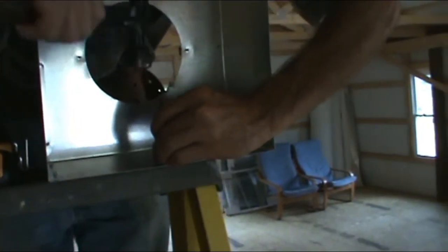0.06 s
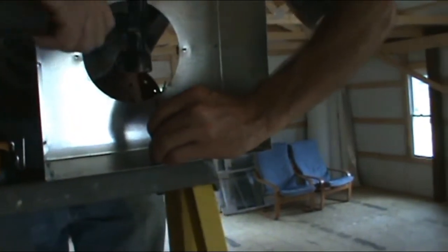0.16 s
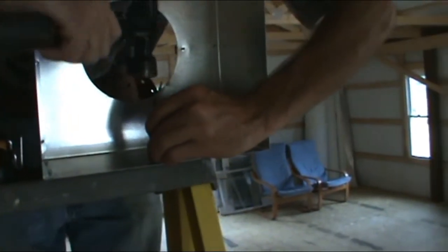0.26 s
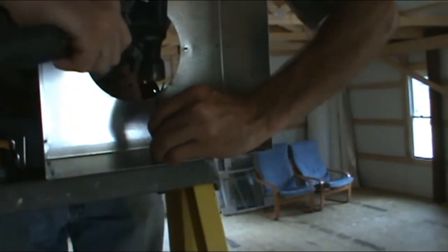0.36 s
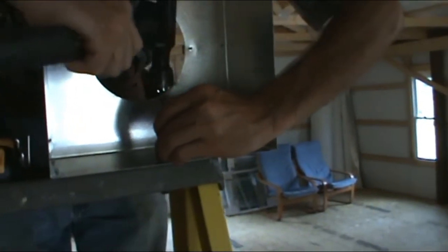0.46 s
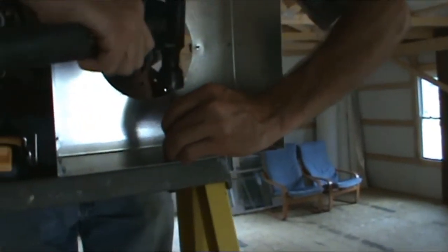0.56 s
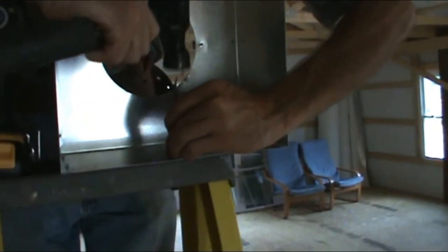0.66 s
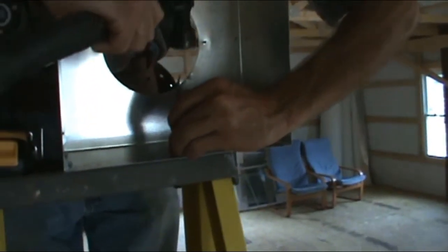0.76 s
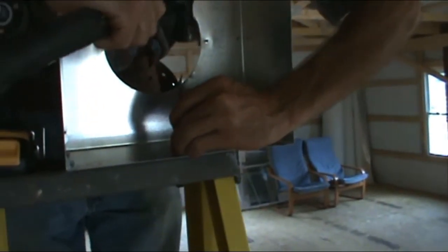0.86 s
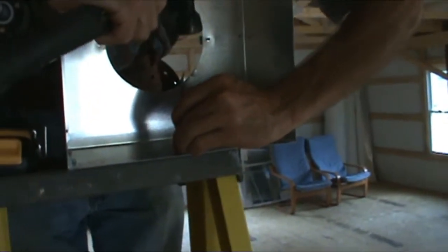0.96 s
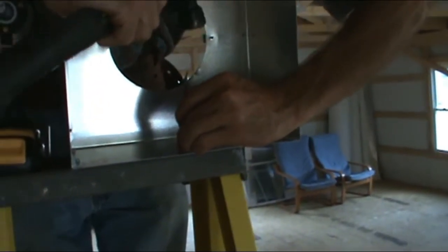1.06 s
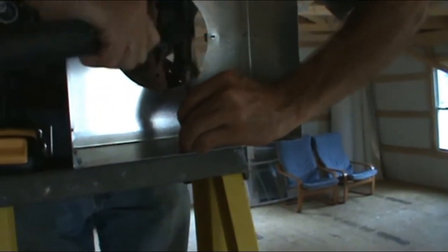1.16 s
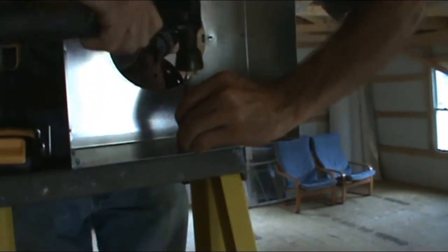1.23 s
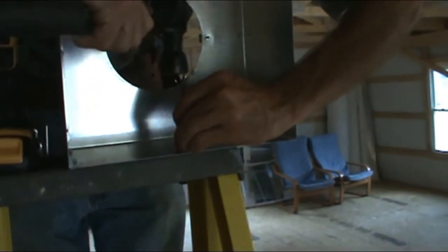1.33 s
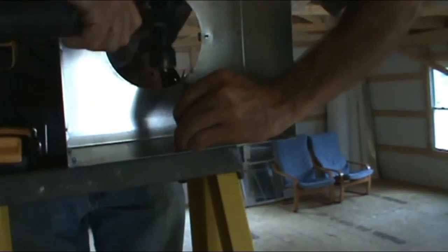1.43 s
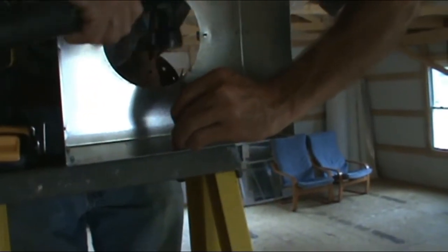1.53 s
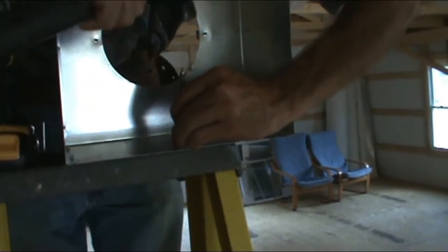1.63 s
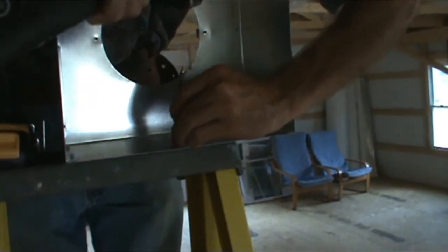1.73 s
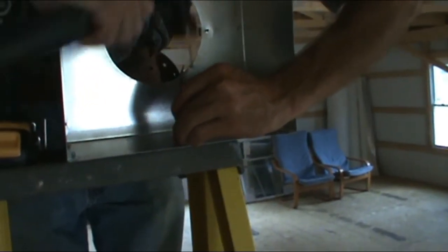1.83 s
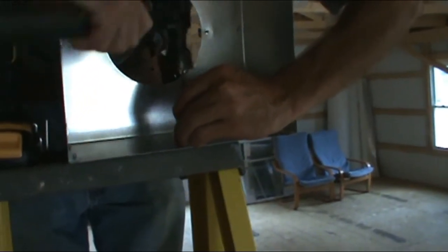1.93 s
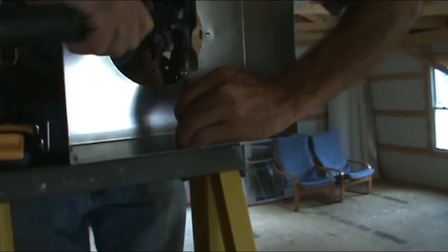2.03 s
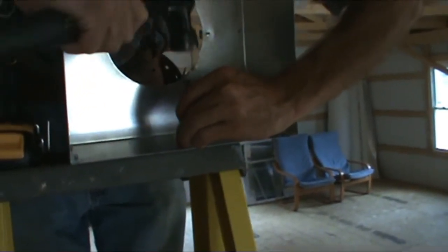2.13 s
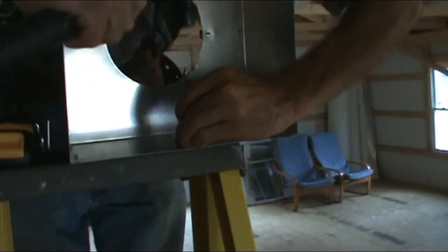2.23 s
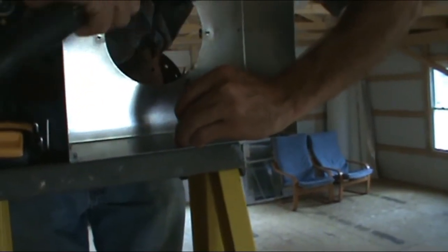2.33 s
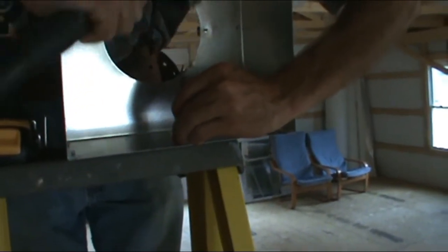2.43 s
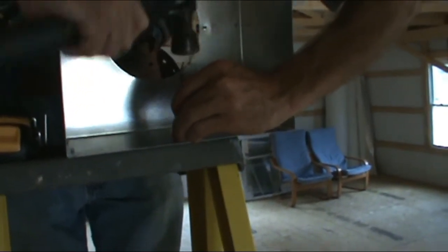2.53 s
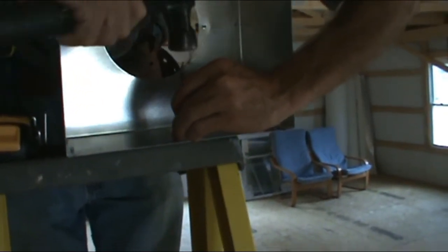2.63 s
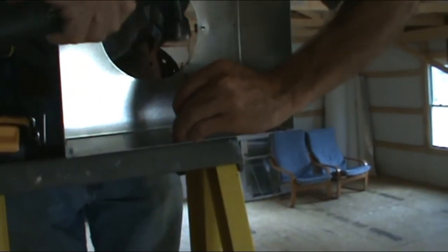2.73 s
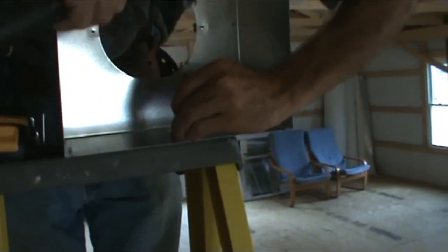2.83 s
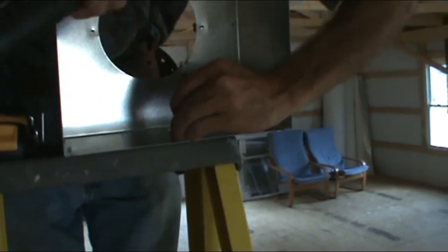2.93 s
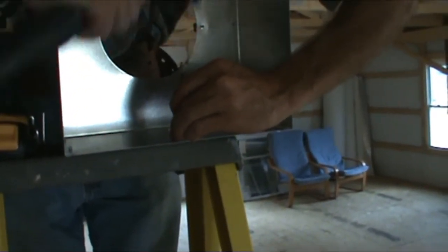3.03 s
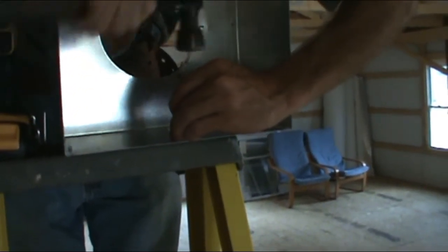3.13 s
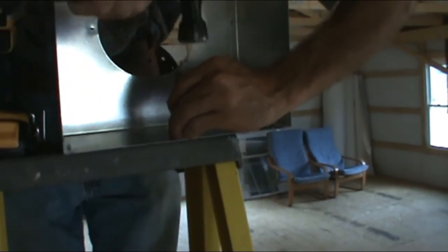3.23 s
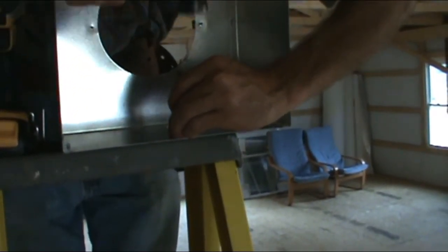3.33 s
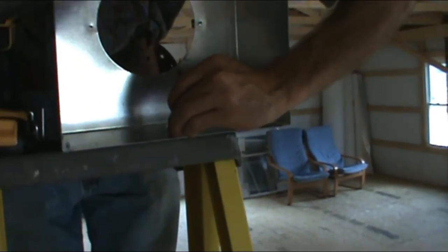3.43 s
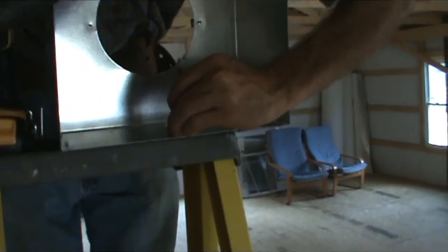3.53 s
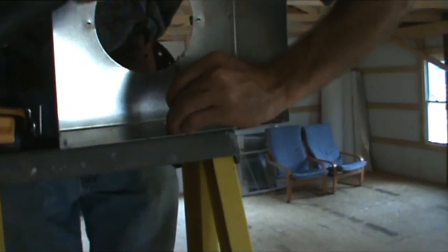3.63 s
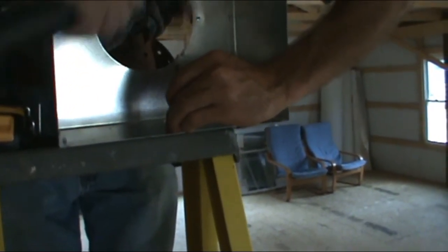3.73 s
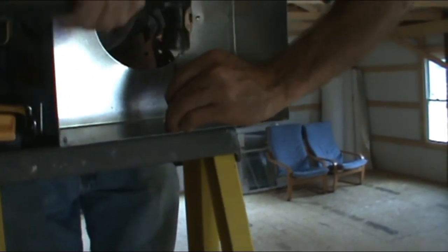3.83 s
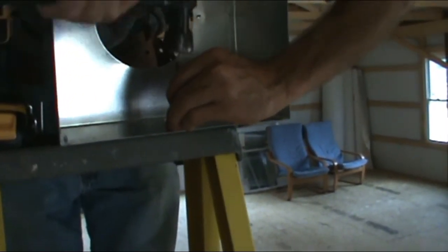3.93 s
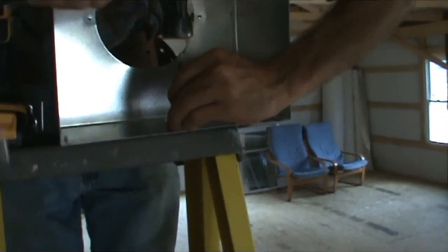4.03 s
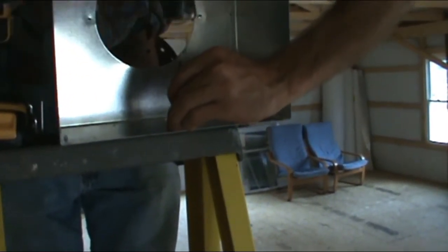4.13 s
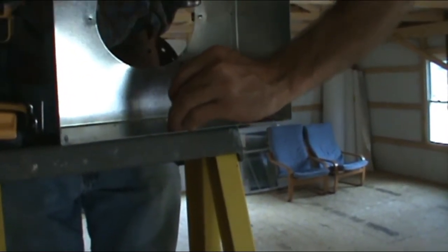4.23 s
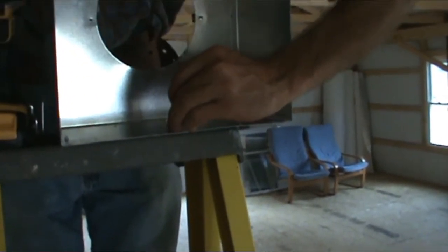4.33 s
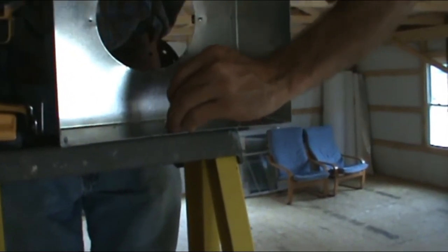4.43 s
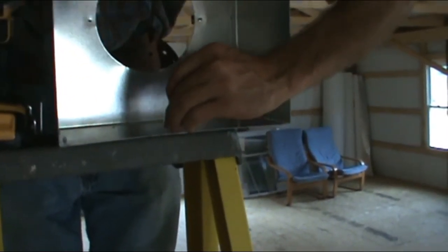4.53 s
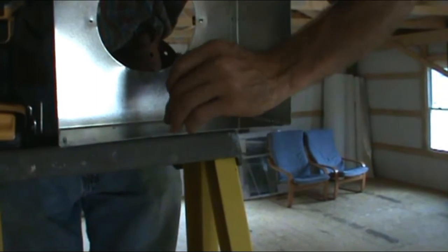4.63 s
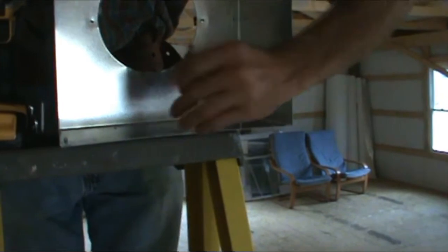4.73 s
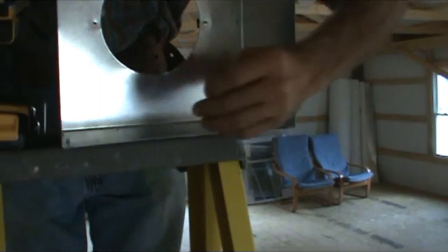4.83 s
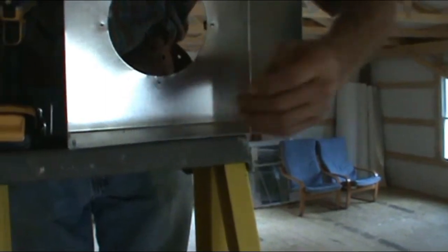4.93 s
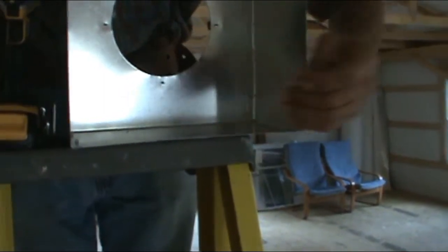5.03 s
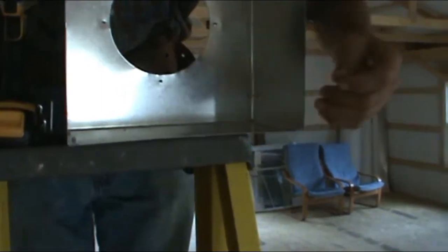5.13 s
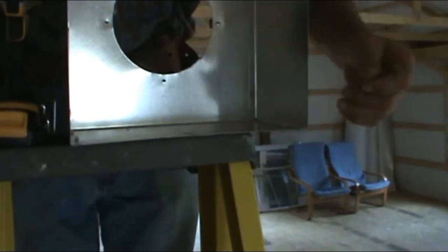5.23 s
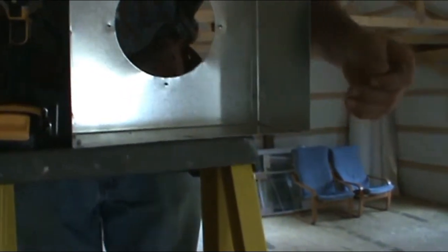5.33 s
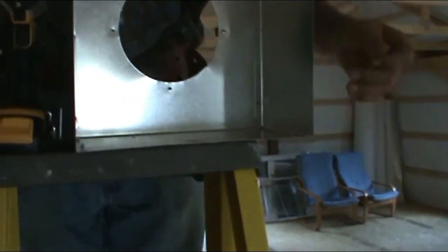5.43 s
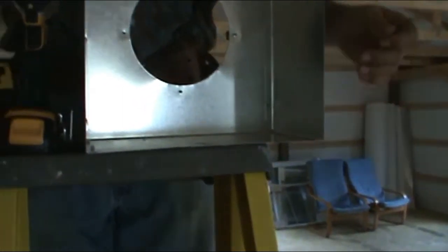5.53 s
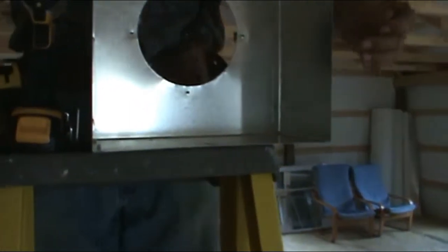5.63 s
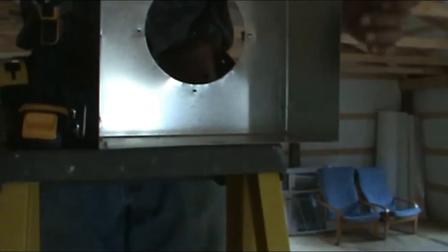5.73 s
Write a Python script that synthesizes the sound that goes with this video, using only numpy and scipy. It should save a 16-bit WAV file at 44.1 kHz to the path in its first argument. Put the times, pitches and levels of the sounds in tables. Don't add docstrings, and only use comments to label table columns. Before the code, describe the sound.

After a near-quiet start with hiss and a faint slide, heavy hammering begins on a thin metal duct on a bench. The first blow is looser and shorter; the next five are louder, dense and clangorous, flattened by the camera's limiter. A high steel clink, a knock and a scuffing shove follow while the ring dies away in a lively wooden shed.

```python
import sys
import numpy as np
from scipy import signal
from scipy.fft import rfft, irfft
from scipy.io import wavfile
from scipy.ndimage import uniform_filter1d, minimum_filter1d

SR = 44100
rng = np.random.default_rng(int(sys.argv[2]) if len(sys.argv) > 2 else 0)


def ratio(d):
    e = np.asarray(d, float) / 20
    return 10 ** e


def int16_out(signal):
    q = np.round(np.clip(np.atleast_2d(signal).T, -1, 1) * 32767)
    wavfile.write(sys.argv[1], SR, q.astype(np.int16))


N = 254412


def read(points, hz):
    f, value = np.transpose(points)
    return np.interp(np.log(hz + 1), np.log(f + 1), value)


def evened(x):
    return x / np.sqrt(np.mean(x ** 2) + 1e-20)


def add(mix, start_s, sound):
    part = mix[..., round(start_s * SR):][..., :sound.shape[-1]]
    part += sound[..., :part.shape[-1]]


def coloured(points, length=N, count=1):
    z = rfft(rng.standard_normal((count, length)))
    z = z * ratio(read(points, np.fft.rfftfreq(length, 1 / SR)))
    return evened(irfft(z, length))


def modes(table, length, wobble, spread_db):
    hz, db, t60_s = np.transpose(table)[:, :, None]
    t = np.arange(length) / SR
    luck = rng.standard_normal((len(table), 2))
    knot_gap = 1200
    knots = rng.standard_normal((len(table), length // knot_gap + 2))
    waver = np.array([np.interp(np.arange(length) / knot_gap, np.arange(len(k)), k) for k in knots])
    turns = np.cumsum(hz * (1 + wobble * waver), axis=1) / SR
    level_db = db + spread_db * luck[:, :1] - 60 * t / np.maximum(t60_s, .005)
    return (ratio(level_db) * np.sin(2 * np.pi * turns + 1.07 * luck[:, 1:])).sum(0)


def rustle():
    # start_s, peak_db, rise_s, fade_db_per_s
    stroke_groups = [
        [(0.0, -42, 0.0023, 150), (0.1, -47.5, 0.088, 123), (0.3, -53, 0.015, 600)],
        [(4.673, -20.5, 0.0048, 122), (4.846, -21.5, .002, 700), (4.88, -34, 0.03, 91)],
        [(5.673, -46, .0008, 250), (5.68, -40.5, 0.056, 324)],
    ]
    # pitch_hz, level_db (per Hz)
    stroke_colours = [
        [(59, -24), (100, 6), (143, -25), (321, -3), (367, -17), (468, -6), (609, -8), (9000, -26.5), (11700, -36), (19800, -120)],
        [(45, -30.5), (110, -6), (300, -1.5), (800, 3), (1500, -1), (2400, -6.5), (3200, -22.5), (5500, -20.5), (7000, -28), (14000, -69)],
        [(100, -15), (500, -3), (750, 6), (1400, 1.5), (2000, -10), (3000, -17), (3300, -3.5), (3700, -30), (9000, -49)],
    ]
    rise_shape = 0.4
    t, out = np.arange(N) / SR, np.zeros((2, N))
    for rows, colour in zip(stroke_groups, stroke_colours):
        start_s, peak_db, rise_s, fade_db_per_s = np.transpose(rows)[:, :, None]
        rise = np.clip((t - start_s) / rise_s, 0, 1) ** rise_shape
        fade_db = fade_db_per_s * np.maximum(t - start_s - rise_s, 0)
        strokes = rise * ratio(peak_db - fade_db)
        out += np.linalg.norm(strokes, axis=0) * coloured(colour, count=2)
    clumps = evened(uniform_filter1d(rng.standard_normal(N), 300))
    return out * ratio(1.8 * clumps - 1.5)


def ports(pair, same):
    # pitch_hz, lead_rad
    port_lead = [(60, .1), (150, .3), (340, .8), (780, .8), (1030, 1.2), (1720, .6), (3010, .3), (6500, .4),
                 (8200, .15), (15800, 0)]
    # pitch_hz, level_db
    left_over_right = [(60, -8), (110, 1), (200, -1), (380, 0), (700, -3), (1290, 0), (2380, 0.0),
                       (4400, -1), (8120, 1.5), (15000, 3.5)]
    hz, (a, b) = np.fft.rfftfreq(N, 1 / SR), rfft(pair)
    same = np.clip(same(hz), 0, 1)
    right = same * a * np.exp(-1j * read(port_lead, hz)) + np.sqrt(1 - same ** 2) * b
    half = ratio(read(left_over_right, hz) / 2)
    return irfft([a * half, right / half], N)


def camera():
    # pitch_hz, level_db (per Hz)
    hiss_colour = [(15, -71), (25, -22), (123, 2.5), (166, -7), (195, 1), (277, -22.5), (373, -19.5),
                   (405, -10.5), (451, -16.5), (1070, -21), (1940, -18.5), (5430, -25.5), (7920, -19.5),
                   (8830, -25), (16000, -31)]
    # pitch_hz, level_db, t60_s
    motor_modes = [(2050, -2, .025), (2350, 0, .03), (2900, -3, .04), (3600, -7, .015), (6200, 1, .014)]
    # pitch_hz, level_db, t60_s
    body_modes = [(2130, 10.5, 0.0083), (2690, -14, 0.011), (3370, 4, 0.005), (6100, 17, 0.0072),
                  (7800, -8, .01), (8900, 6, 0.0057)]
    # start_s, peak_db
    body_clicks = [
        (0.3188, -41.5),
        (1.2354, -36.5),
        (2.537, -46),
        (4.848, -32.5),
        (5.059, -61),
    ]
    tick_s, tick_gap_s = 5.2067, 1001 / 30000
    tick_db, weak_tick_db = -52, -55
    pause_start_s, pause_end_s = .33, .8
    hiss_db, hiss_sag_db_per_s = -50, 0.5
    out = np.zeros(N)
    for k, start_s in enumerate(tick_s + tick_gap_s * np.arange(-155, 17)):
        if not pause_start_s < start_s < pause_end_s:
            level_db = tick_db if k % 2 else weak_tick_db
            add(out, start_s, ratio(level_db) * modes(motor_modes, length=1400, wobble=.011, spread_db=1.5))
    for start_s, peak_db in body_clicks:
        add(out, start_s, ratio(peak_db - 6) * modes(body_modes, length=1000, wobble=.006, spread_db=1.5))
    hiss = ratio(hiss_db - hiss_sag_db_per_s * np.arange(N) / SR) * coloured(hiss_colour, count=2)
    return out * ratio([[.5], [-.5]]) + ports(hiss, lambda hz: 0.43 + 0 * hz)


def combed(x):
    height_db, spacing_hz = 2.2, 22
    z = rfft(x)
    bins = max(round(spacing_hz * x.shape[-1] / SR), 1)
    bumps = uniform_filter1d(rng.standard_normal(z.shape[-1]), bins)
    bumps = evened(uniform_filter1d(bumps, bins))
    return irfft(z * ratio(height_db * bumps), x.shape[-1])


def blow(force_db, hold_s, tilt_db, bass_db, ring, colour, strong, strong_db, wobble):
    # pitch_hz, t60_s
    sheet_t60 = [(60, 1.44), (200, 1.165), (500, 1.324), (1000, 0.58), (2000, 0.55), (4000, 0.51),
                 (8000, 0.44), (15000, 0.28)]
    ring_knee_s = 0.023
    ring_spread = .05
    knee = 3
    length = 56000
    hz, t, z = signal.stft(combed(coloured(colour, length=length, count=2)), SR, nperseg=384, noverlap=288)
    ring_factor = ring * hold_s / (hold_s + ring_knee_s)
    ring_factor = ring_factor * np.exp(ring_spread * rng.standard_normal((len(hz), 1)))
    hz = hz[:, None] + 30
    tint_db = tilt_db * np.log2(hz / 2000) + bass_db / (1 + (hz / 800) ** 3)
    swell = 1 - 0.4 * np.exp(-t / (0.7 * hold_s)) / (1 + (hz / 900) ** 2)
    age_s = (t ** knee + hold_s ** knee) ** (1 / knee) - hold_s
    decay_db = 60 * age_s / np.maximum(read(sheet_t60, hz) * ring_factor, .02)
    z *= swell * ratio(tint_db - decay_db)
    crash = signal.istft(z, SR, nperseg=384, noverlap=288)[1][:, :length]
    crash = crash / np.sqrt(np.mean(crash[:, :600] ** 2))
    t = np.arange(length) / SR
    hum = ratio(strong_db) * modes(strong, length, wobble=wobble, spread_db=2.64)
    hum = hum * (1 - np.exp(-t / (0.24 * hold_s + 0.0035)))
    contact = 1 - np.exp(-(t / 0.00032) ** 2)
    spreading = 1 - 0.44 * np.exp(-t / (0.1 * hold_s + 0.00054))
    return ratio(force_db - 9.5) * (crash + hum) * contact * spreading


def hammering():
    # start_s, force_db, hold_s (crash feeds itself)
    first_blow = [
        (.5895, -1, 0.045),
    ]
    later_blows = [
        (1.2512, 4.1, 0.11),
        (1.963, 4.2, 0.13),
        (2.588, 5.5, 0.12),
        (3.169, 4.25, 0.15),
        (3.853, 4.4, 0.14),
    ]
    # start_s, force_db, hold_s, tilt_db (per octave), bass_db
    knocks = [
        (1.761, -5, 0.01, 6.5, 16.5),
        (3.074, -14.5, 0.041, 2.5, 14.5),
        (4.655, -11.5, 0.002, 1, -9),
        (4.674, -14.5, 0.0081, -5.5, -33),
    ]
    steel_hits = [
        (4.280, 4.5, 0.0039, -0.5, 1.1667),
        (4.848, -31, 0.002, 0.5, 8),
        (4.935, -38, 0.0045, -.7, 5.5),
    ]
    # pitch_hz, level_db, t60_s
    loose_modes = [(190, -7, 1.5), (140, -14, 1.2), (430, -7, 1.2), (465, -6, 1.15), (510, -5, 1.0),
                   (720, -9, 1.0), (883, -2, .6), (1560, -11, .7), (1730, -7, .6), (1920, -12, .5)]
    pinned_modes = [(146.44, -8, 1.48), (281.3, -19, 0.6), (393, -2, 0.84), (430.4, -4.5, 1.38),
                    (483.7, -2.5, 0.74), (556, -6.5, 1.12), (693, -9, 0.97), (735.6, -1, 0.88),
                    (924, -11.5, 1.22), (1223, -11.5, 1.02), (1875, -2.5, 0.73)]
    bench_modes = [(291.4, -2, 0.69), (392.7, -9, 1.73), (1650, -10.5, 1.2), (2300, -37, 0.355)]
    steel_modes = [(3570, -5, .24), (3955, -11, .2), (4258, -5, .22), (4883, -12, .2), (6240, -7, .22),
                   (6600, -11, .2)]
    # pitch_hz, level_db (per Hz)
    sheet_colour = [(18, -65), (30, -9.5), (404, -2.5), (600, -6), (721, 1), (988, -3.5), (1720, -4.5),
                    (2230, -8), (3220, -10.5), (7090, -17), (11100, -17.5), (16000, -29)]
    knock_colour = [(35, -53), (60, -5.5), (330, -1.5), (1090, 4), (1220, 4), (1580, 2), (3420, -10.5),
                    (4030, -13.5), (9350, -28), (16000, -44)]
    clank_colour = [(400, -22), (1000, -6.5), (2000, -7.5), (3200, -6), (3600, -0.5), (4300, 5), (5000, -2),
                    (6400, -2.5), (7200, -8), (11500, -16), (16000, -25)]

    out = np.zeros((2, N))
    for start_s, force_db, hold_s in first_blow:
        add(out, start_s, blow(force_db, hold_s, tilt_db=-.9, bass_db=-2, ring=.55, colour=sheet_colour,
                               strong=loose_modes, strong_db=-10, wobble=.018))
    for start_s, force_db, hold_s in later_blows:
        add(out, start_s, blow(force_db, hold_s, tilt_db=0.51, bass_db=-0.45, ring=.87, colour=sheet_colour,
                               strong=pinned_modes, strong_db=-8.5, wobble=.014))
    for start_s, *hit in knocks:
        add(out, start_s, blow(*hit, ring=.7, colour=knock_colour,
                               strong=bench_modes, strong_db=-14, wobble=.008))
    for start_s, *hit in steel_hits:
        add(out, start_s, blow(*hit, ring=.45, colour=clank_colour,
                               strong=steel_modes, strong_db=-10, wobble=.0015))
    return out


def shed(x, wet_db):
    # pitch_hz, t60_s
    shed_t60 = [(60, 0.27), (200, 0.68), (500, 1), (1000, 0.77), (2000, 0.65), (4000, 0.44), (8000, 0.43),
                (15000, 0.42)]
    length = 3 * SR // 2
    taps = np.zeros((2, length))
    at = np.arange(200, length - 10, 10)
    at = at + rng.integers(0, 10, (2, len(at)))
    np.put_along_axis(taps, at, rng.choice([-1., 1.], at.shape), 1)
    hz, t, z = signal.stft(taps, SR, nperseg=512)
    z = z * ratio(-60 * t / read(shed_t60, hz)[:, None])
    tail = signal.istft(z, SR, nperseg=512)[1]
    tail[:, :200] = 0
    tail *= ratio(wet_db) / np.linalg.norm(tail[0])
    tail[:, 0] = 1
    return signal.fftconvolve(x, tail, axes=1)[:, :N]


def scene():
    # pitch_hz, likeness (0 to 1)
    port_likeness = [(60, .96), (130, .94), (290, .78), (640, .62), (1410, .64), (3100, .76), (6820, .76),
                     (10000, .84), (15000, .92)]
    room = shed(hammering() + rustle(), wet_db=-4.5)
    return ports(room, lambda hz: read(port_likeness, hz)) + camera()


def hush(x):
    ahead_s, rise_db, treble_hz = .009, 23, 1100
    high = signal.sosfiltfilt(signal.butter(2, treble_hz, "high", fs=SR, output="sos"), x)
    level_db = 10 * np.log10(abs(uniform_filter1d((high ** 2).mean(0), size=90)) + 1e-12)
    ahead = round(ahead_s * SR)
    coming_db = -minimum_filter1d(-level_db, size=ahead, origin=-(ahead // 2))
    shut = np.clip((coming_db - level_db - rise_db) / 6, 0, 1)
    return x - uniform_filter1d(shut, size=60) * high


def low_pass(x):
    return signal.sosfilt(signal.butter(12, 16310, fs=SR, output="sos"), x)


def record(dry):
    low_cut_hz, edge_hz = 62, 16000
    recovery_db_per_s = 150.0
    dry = signal.sosfilt(signal.butter(2, low_cut_hz, "high", fs=SR, output="sos"), dry)
    power_db = 10 * np.log10(abs(uniform_filter1d((dry ** 2).mean(0), 260)) + 1e-12)
    fall_db = np.arange(N) * recovery_db_per_s / SR
    held_db = np.maximum.accumulate(power_db + fall_db) - fall_db
    over_db = np.maximum(held_db + 9.0, 0)
    held = dry / ratio(1.032 * uniform_filter1d(over_db, 200))
    edge = signal.firwin(255, edge_hz, window=("kaiser", 8), fs=SR)[None]
    mix = signal.oaconvolve(np.clip(hush(held), -1, 1), edge, "same")
    return low_pass(mix)


dry = scene()
out = record(dry)
int16_out(out)
```